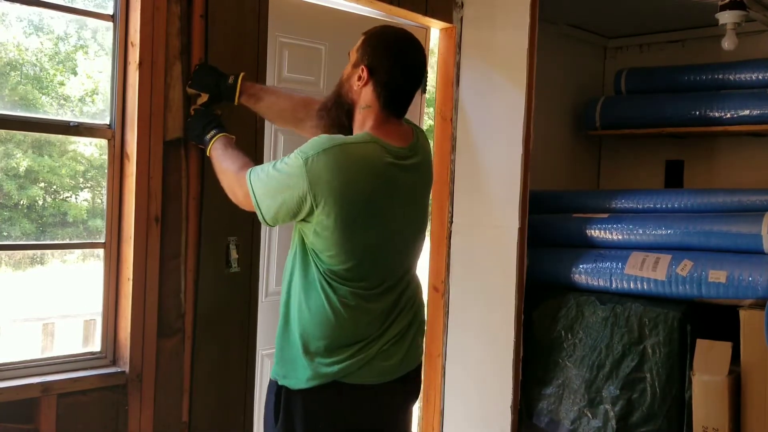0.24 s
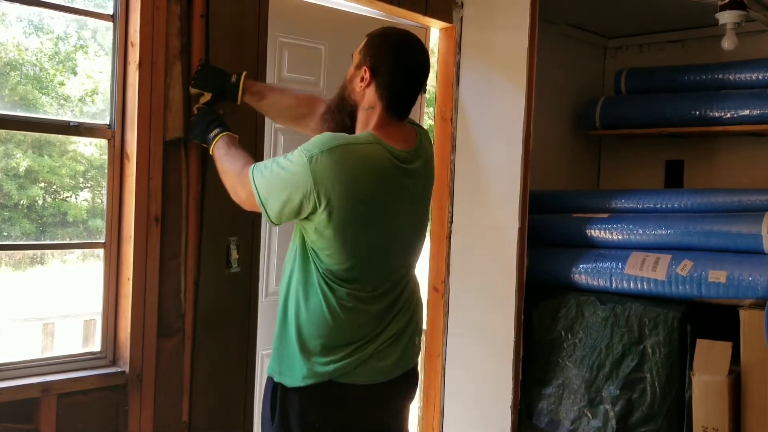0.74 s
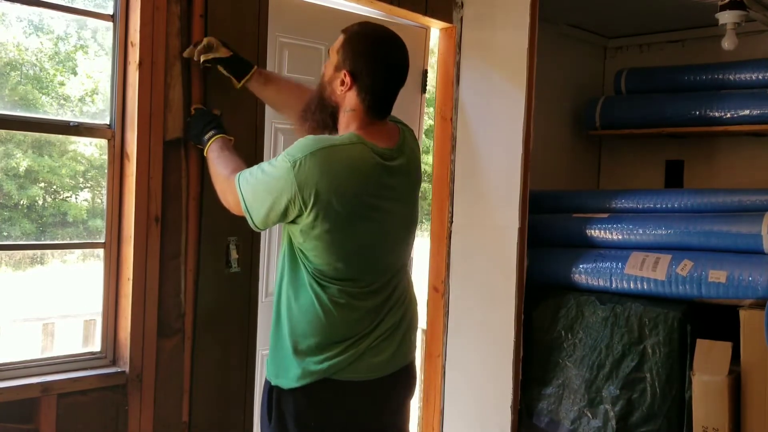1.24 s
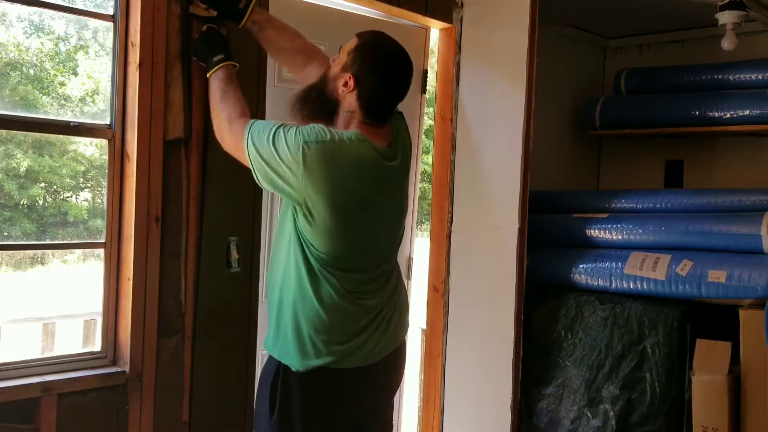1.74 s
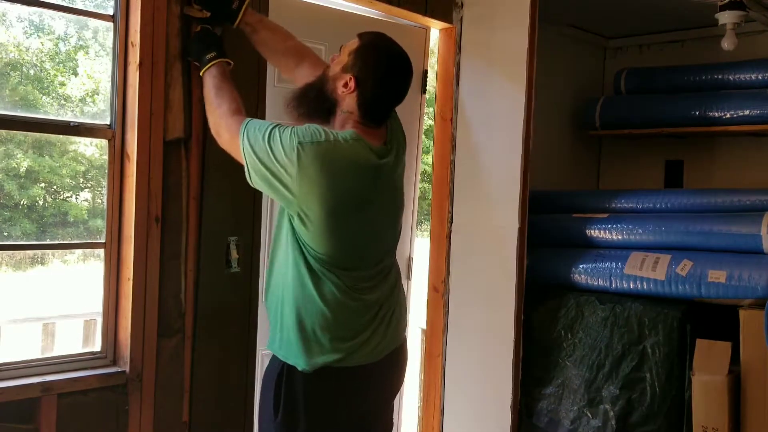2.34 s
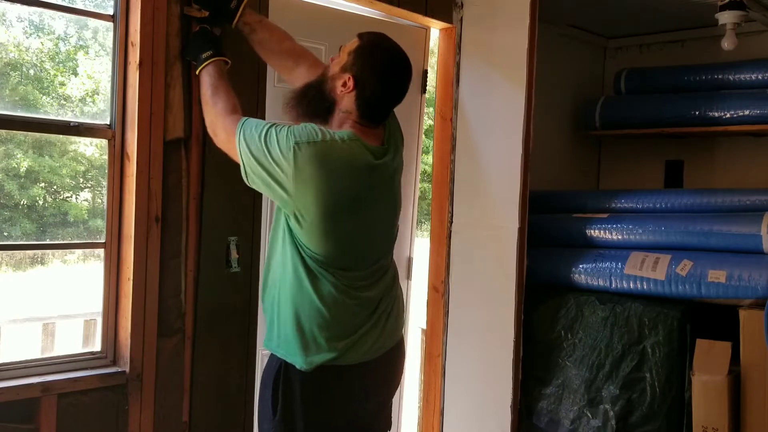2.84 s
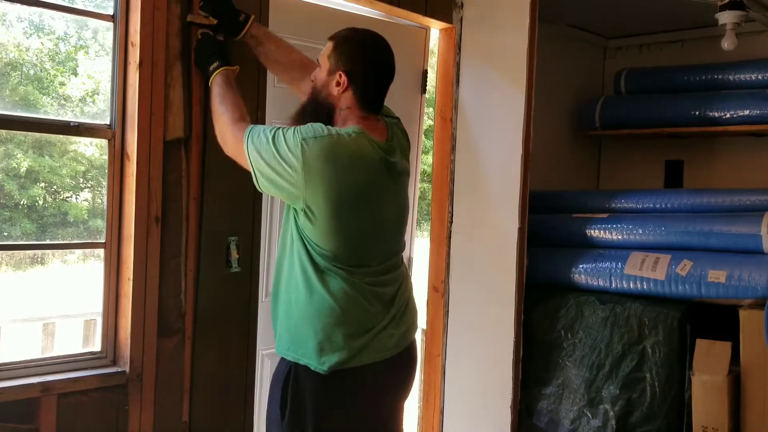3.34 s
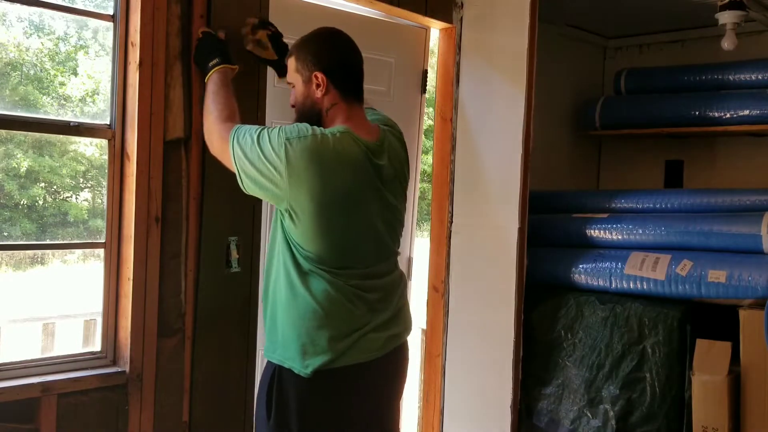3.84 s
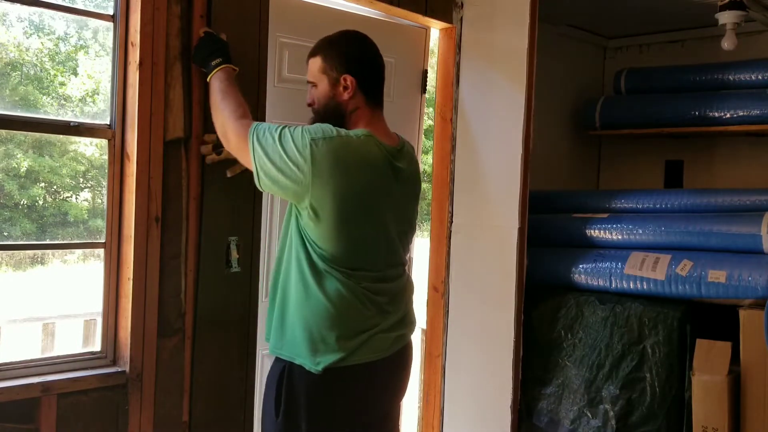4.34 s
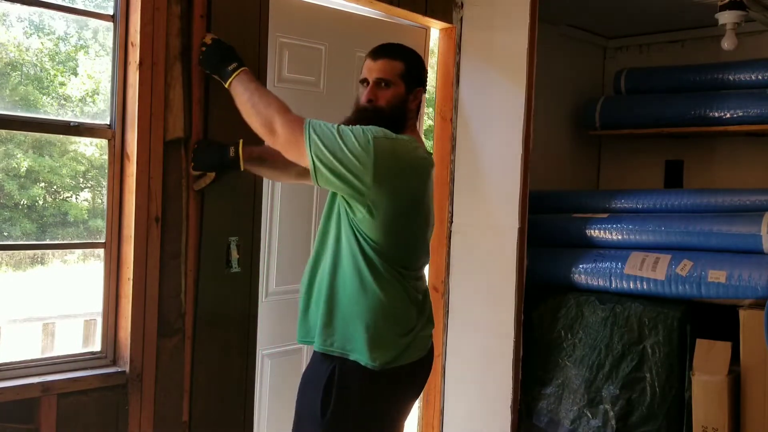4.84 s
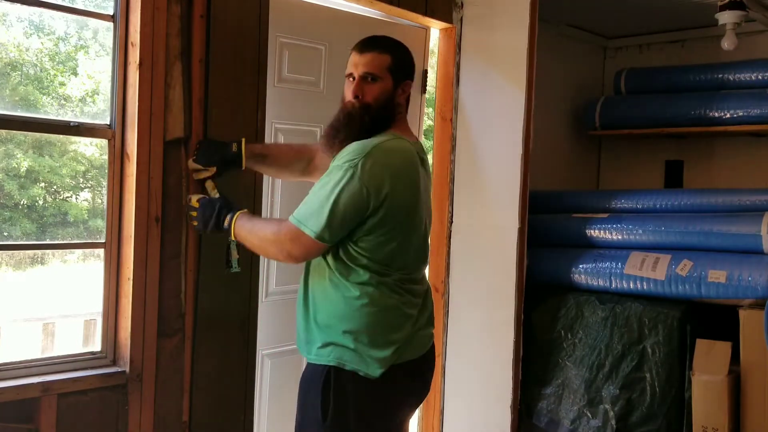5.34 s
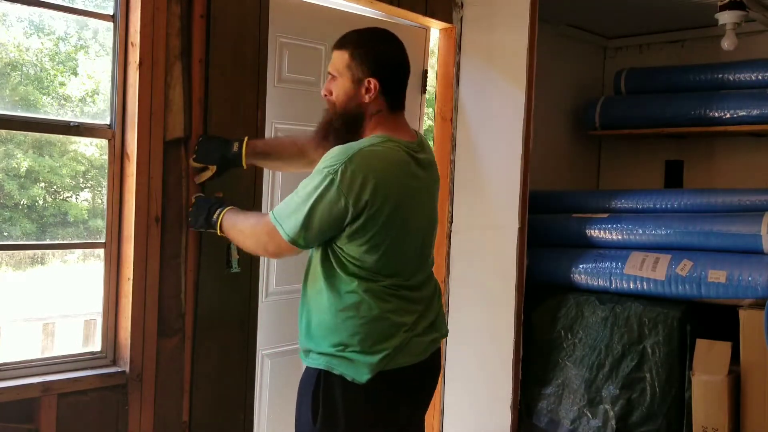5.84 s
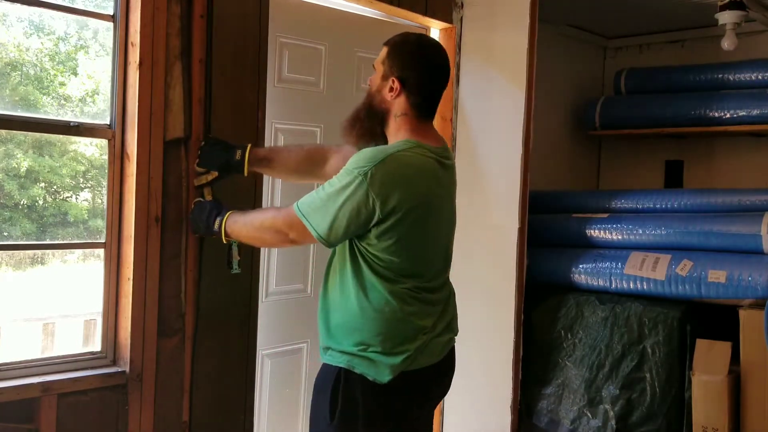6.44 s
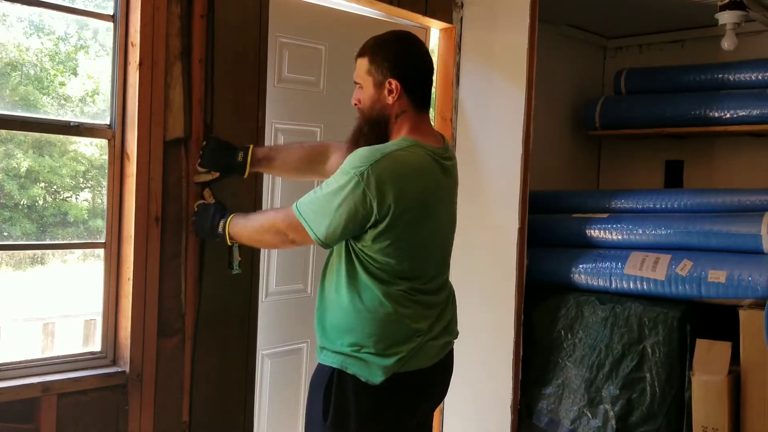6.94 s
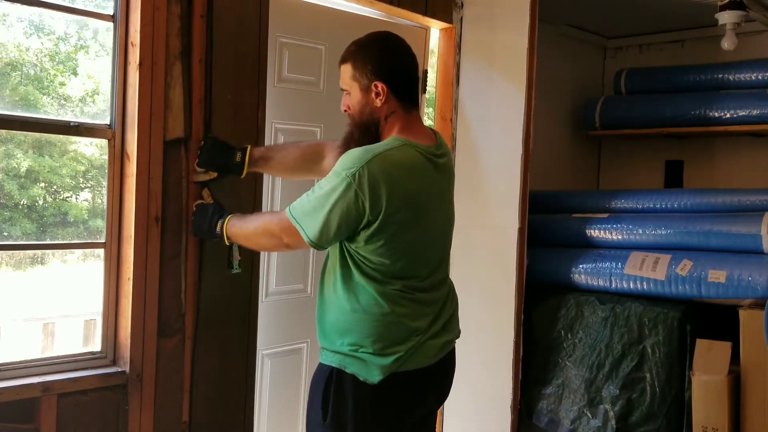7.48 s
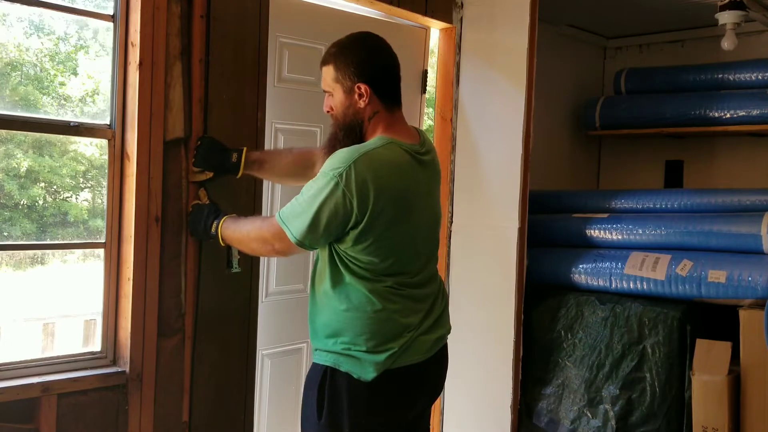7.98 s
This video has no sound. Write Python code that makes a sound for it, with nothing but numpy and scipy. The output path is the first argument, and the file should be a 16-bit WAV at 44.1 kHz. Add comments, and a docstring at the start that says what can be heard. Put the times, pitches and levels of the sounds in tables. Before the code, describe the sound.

A pry bar levers wooden trim off a door frame, with sharp cracks, dull wall thuds, scrapes and brief metal rattles.

```python
"""A bare room, where a few steps away a flat pry bar levers wooden trim off a door frame.
Each heave loads the stud wall with a thud, fibres and nails let go in sharp cracks, and the wall
springs back. Now and then the steel bar chatters on a nail and rings; between heaves, bar and gloves
scrape along the wood. The room gives cracks, scrapes and rings a short, bright tail.
Underneath lie a low rumble from outdoors and a faint hiss."""
import sys
import numpy as np
from scipy import signal
from scipy.fft import rfft, irfft, next_fast_len
from scipy.io import wavfile
from scipy.ndimage import uniform_filter1d

SR = 44100
rng = np.random.default_rng(int(sys.argv[2]) if len(sys.argv) > 2 else 0)


def dump_mix(stems):
    """Bounce the given channels to the path in sys.argv[1] as a 16-bit WAV at rate SR."""
    frames = np.atleast_2d(stems).T  # one column per channel
    limited = np.clip(frames, -1, 1)  # hard clip at full scale
    pcm = np.round(limited * 32767).astype(np.int16)
    wavfile.write(sys.argv[1], SR, pcm)


N = 362061


def gain_of(db):
    """Decibels to amplitude."""
    return 10 ** (np.asarray(db) / 20)


def unit_rms(x):
    """Scales to rms 1."""
    return x / np.sqrt(np.mean(x ** 2) + 1e-20)


def curve_at(points, hz):
    """Reads a curve on a log-frequency axis."""
    point_hz, value = np.transpose(points)
    return np.interp(np.log(hz + 1), np.log(point_hz + 1), value)


def add(mix, start_s, sound):
    """Mixes a stereo sound in from start_s."""
    start = round(start_s * SR)
    sound = sound[:, max(-start, 0):]
    part = mix[:, max(start, 0):][:, :sound.shape[1]]
    part += sound[:, :part.shape[1]]


def leak(energy, decay_s):
    """Lets energy leak away with the given time constant."""
    keep = np.exp(-1 / (decay_s * SR))
    return signal.lfilter([1 - keep], [1, -keep], energy + 1e-30)


def diffuse_field(size):
    """The stereo spectrum of noise arriving from all sides, most alike left and right in the bass."""
    # how closely the two sides agree: frequency_hz, correlation
    likeness = [(100, 0.81), (300, .88), (600, 0.47), (1200, 0.15), (2500, 0.0089), (15000, 0.6)]
    same = np.clip(curve_at(likeness, np.fft.rfftfreq(size, 1 / SR)), -1, 1)
    left, unrelated = rfft(rng.standard_normal((2, size)))
    return np.array([left, same * left + np.sqrt(1 - same ** 2) * unrelated])


def room(x, direct_db, left_db=-5, right_db=-10, treble_lift=0.71, build_s=0.0005, size=24576):
    """The direct sound reaches the left first; its energy fills the room and dies band by band."""
    # decay between the bare walls: centre_hz, t60_s
    decays = [(300, .27), (900, .25), (5000, 0.29), (14000, 0.24)]
    x, hz = np.pad(x, (0, size - len(x))), np.fft.rfftfreq(size, 1 / SR)
    facing = x + treble_lift * np.diff(x, prepend=0)  # the left side faces the work
    out = gain_of(direct_db) * np.array([gain_of(left_db) * facing, gain_of(right_db) * np.roll(x, 3)])
    field, energy = diffuse_field(size), leak(x ** 2, build_s)
    centres, t60s = np.transpose(decays)
    for share, t60 in zip(np.eye(len(t60s)), t60s):
        band = irfft(field * curve_at(np.c_[centres, share], hz))
        out += band * np.sqrt(leak(energy, t60 / (2 * np.log(1000))))
    return out


def wood_tone(x, spectrum, bass_db, middle_db, top_db, size=4096):
    """Colours a sound with the wood's spectrum and the tilt and dense, uneven modes of one spot."""
    hz = np.fft.rfftfreq(size, 1 / SR)
    tilt = [(330, bass_db), (600, middle_db), (850, middle_db), (2200, 0), (6000, 0), (13000, top_db)]
    modes_db = sum(depth_db * unit_rms(uniform_filter1d(rng.standard_normal(len(hz)), bins))
                   for bins, depth_db in [(4, 1.9), (24, 1.7)])
    response = gain_of(curve_at(spectrum, hz) + curve_at(tilt, hz)) * unit_rms(gain_of(modes_db))
    cepstrum = irfft(np.log(response))
    cepstrum[1:size // 2] *= 2  # folded to minimum phase, so attacks stay sharp
    cepstrum[size // 2 + 1:] = 0
    impulse = irfft(np.exp(rfft(cepstrum)))
    return signal.fftconvolve(x, impulse[None], axes=1)


def background(hiss_db=1, rumble_db=-72, rumble_swing=1.7, split_hz=400, waver_db=2):
    """A low, wavering rumble from outdoors under a faint hiss; both rise and fall together."""
    # colour of the ambience: frequency_hz, level_db
    spectrum = [(15, -44), (25, -7.5), (102, -3), (175, -14), (212, -23), (344, -20.5), (384, -23),
                (545, -24), (887, -25), (2000, -25.5), (6380, -29), (7710, -26), (16000, -26)]
    # its slow rise and fall: time_s, level_db
    swell = [(0, -70.5), (1.5, -73.5), (2, -80.5), (2.9, -76.5), (3.75, -80), (4.3, -73.5), (5, -69),
             (8.2, -73.5)]
    hz, t = np.fft.rfftfreq(N, 1 / SR), np.arange(N) / SR
    air = diffuse_field(N) * gain_of(curve_at(spectrum, hz))
    lowpass = 1 / (1 + (hz / split_hz) ** 4)
    level = np.interp(t, *np.transpose(swell))
    knots_s = np.arange(0, 9, .12)
    waver = waver_db * np.interp(t, knots_s, rng.standard_normal(len(knots_s)))
    rumble_gain = gain_of(rumble_db + rumble_swing * (level - level.mean()) + waver)
    rumble = unit_rms(irfft(air * lowpass, N)) * rumble_gain
    hiss = unit_rms(irfft(air * (1 - lowpass), N)) * gain_of(level + hiss_db)
    return rumble + hiss


def wall_thuds(soft_hz=340, push_s=0.032, release_s=0.021, strain_db=-13.5, stereo_width=.14):
    """A soft push sets the wall panels booming; they judder under strain and boom again when eased."""
    # resonances of the stud wall: pitch_hz, bandwidth_hz, level_db
    modes = [(73, 15, -4.5), (121, 28, -2.5), (165.4, 20, -0.5), (228, 28, -2), (261, 25, 3.5),
             (295, 50, 0)]
    # heaves on the bar, higher on stiffer spots: start_s, push_db, held_s, rebound_db, pitch_factor
    heaves = [ (0, -62, 0.037, -55, 0.97), (.316, -52, 0.11, -55, 1.02), (.717, -52, 0.071, -49.5, 1.16),
              (0.974, -62, .039, -53, 1.45), (1.16, -73, .037, -56.5, 1.1), (1.63, -55, .14, -43, 1.05),
              (2.093, -56, 0.15, -53, 1.02), (2.545, -56, 0.17, -49, 1.105),
              (3.03, -54.5, .16, -50.5, 1.066), (3.45, -75, 0.045, -51, 1.06),
              (4.799, -55.5, 0.073, -42.5, 0.88), (5.757, -46.5, 0.099, -70, .62),
              (6.27, -45, 0.16, -53.5, 0.76), (6.82, -57, 0.17, -57, 1.04),
              (7.31, -68.5, .198, -57.5, 1.55), (7.694, -58, .15, -53.5, 1.05)]
    out, t = np.zeros((2, N)), np.arange(SR // 2) / SR
    wall = sum(gain_of(db) * np.exp(-np.pi * width * t) * np.sin(2 * np.pi * hz * t) * (-1) ** k
               for k, (hz, width, db) in enumerate(modes))
    wall = signal.sosfilt(signal.butter(6, soft_hz, fs=SR, output="sos"), wall)
    for start_s, push_db, held_s, rebound_db, pitch_factor in heaves:
        panel = np.interp(t * pitch_factor, t, wall)
        push = start_s, push_db, push_s
        strain = start_s + push_s, push_db + strain_db, held_s
        rebound = start_s + held_s, rebound_db, push_s
        for at_s, db, length_s in push, strain, rebound:
            envelope = np.exp(-np.maximum(t - length_s, 0) / release_s)
            mid, side = rng.standard_normal((2, len(t))) * envelope
            force = [mid + stereo_width * side, mid - stereo_width * side]
            boom = signal.fftconvolve(force, panel[None], axes=1)
            power = np.sum(boom[0] ** 2) / (SR * (length_s + release_s))
            add(out, at_s - .005, gain_of(db) * boom / np.sqrt(power))
    return out


def scrapes(gain_db=-3, slips_per_s=2000, uneven_db=6.5, direct_db=-2, bass_db=-0.5, middle_db=-1):
    """Dense, tiny slips over the grain swell and fade with each stroke."""
    # bar and gloves sliding on wood: peak_s, level_db, half_length_s, body_db, top_db
    strokes = [ (.002, -38, 0.0031, -9, -9.5), (0.345, -47, 0.0074, 3.5, 0),
               (1.02, -34.5, 0.0095, -1.5, -5.5), (1.188, -43, 0.011, -5.5, -3), (3.152, -62, 0.061, 6, -1),
               (3.49, -39, .015, -8, -3.5), (3.858, -57.5, .025, -7.5, -8), (4.035, -45.5, .018, -20.5, 0),
               (4.436, -58, 0.073, -4.5, 2), (4.548, -48, 0.017, 1, -9), (4.64, -46, 0.028, 4.5, -3),
               (4.822, -43.5, 0.049, -8.5, 0), (4.882, -34, 0.022, -6.5, -8.5),
               (5.141, -41.5, 0.024, -21, -7.5), (5.242, -47, 0.018, -2.5, -5),
               (5.727, -48, 0.054, -1.5, -5.5), (5.876, -55.5, 0.025, 15.5, -3),
               (6.051, -61, 0.044, -2, -3), (6.237, -33, 0.011, -15.5, -3), (6.442, -40.5, 0.04, -9.5, -4),
               (6.762, -52.5, 0.021, -5, -1), (6.986, -48.5, 0.043, -5, -1.5), (7.522, -59.5, 0.059, -3, 3),
               (7.826, -52.5, 0.032, -1, 3.5), (8.2, -62, 0.096, -1, -2)]
    # colour of rubbed wood: frequency_hz, level_db
    spectrum = [(30, 7.5), (90, 4), (200, 9.5), (380, 9.5), (600, 8), (900, -1.5), (1350, 0.5),
                (1800, -3.5), (2400, -2), (3300, -4), (4500, -1), (7500, 2), (9500, -1.5), (15000, 1.5)]
    out, t = np.zeros((2, N)), np.arange(-SR // 4, SR // 4) / SR
    for peak_s, db, half_length_s, body_db, top_db in strokes:
        sizes = gain_of(uneven_db * np.minimum(rng.exponential(1, len(t)), 4))
        signs = rng.choice([-1, 1], len(t))
        slipping = rng.random(len(t)) < slips_per_s / SR
        stroke = unit_rms(sizes * signs * slipping) / np.cosh(t / half_length_s)
        tilt_db = body_db + bass_db, body_db + middle_db, top_db
        scrape = wood_tone(room(stroke, direct_db), spectrum, *tilt_db)
        add(out, peak_s + t[0], gain_of(db + gain_db) * scrape)
    return out


def wood_cracks(gain_db=26, main_share=0.5, lead_in=.9, tear_share=0.01, tear_s=0.0043, fibres=16):
    """One main fibre snaps; smaller ones lead up to it quickly and trail off after it."""
    # wood letting go: time_s, level_db, splinter_spread_s, body_db, top_db, direct_db
    cracks = [ (.073, -64, .0007, -7, 13, 1), (.356, -45, 0.0033, 8, 7, 1),
              (.39, -52.5, 0.00045, 8, 4.5, 0.5), (0.763, -30.5, 0.0011, -3, 5, -3),
              (.778, -35, 0.002, 5, 10.5, -2), (.801, -24.5, 0.00096, -9.5, -2, 11),
              (1.666, -28, 0.0012, -1, 3.5, -4.5), (1.678, -37, 0.0015, 3.5, -5, -3.5),
              (1.7246, -31.5, 0.00071, 5, -1, 3.5), (2.129, -31, 0.0012, 1, 1, -5.5),
              (2.135, -24.5, 0.0011, 1, -4, 1.5), (2.272, -54, 0.0031, 8, 1, 5.5),
              (2.37, -67.5, 0.0015, -6.5, 6.5, 1.5), (2.593, -36.5, 0.0015, -0.5, -2.5, -2.5),
              (2.6, -26, .0018, 5.5, -1, -0.5), (2.6419, -30, 0.00078, 1.5, 2, -2),
              (3.082, -45, 0.0016, 3, -12.5, -2.5), (3.372, -59, 0.00021, -3, 4, -3),
              (3.5, -42.5, 0.0014, 5.5, -4.5, 10), (4.582, -42, .002, -23, 5, -4),
              (4.646, -37.5, .0017, -16, -5.5, 1), (5.079, -49, 0.00073, 10.5, -7, -14),
              (6.167, -26.5, 0.0013, -7.5, -2.5, -2.5), (6.209, -31.5, 0.0018, 0.5, 4, 0),
              (6.257, -18.5, 0.0027, 0.5, 3, -8), (6.272, -15, 0.002, 0.5, -3, -13),
              (6.301, -14, 0.0036, -3.5, -2.5, 7), (6.78, -34, 0.00067, -12, -3, 1.5),
              (6.8142, -15, 0.0011, 4, -4, -0.5), (6.8487, -21, 0.00025, 2, 1.5, 5.5),
              (6.871, -25, 0.0038, 0, -2, 11), (7.017, -46.5, 0.00043, -23, 7, -17),
              (7.285, -38.5, 0.0024, -6, 0.5, -3.5), (7.316, -42.5, 0.0072, 1.5, -3, 2.5),
              (7.483, -55.5, 0.00065, 1, 3, -2), (7.691, -36, 0.00086, -8.5, 5.5, -1.5)]
    # colour of splitting wood: frequency_hz, level_db
    spectrum = [(30, -19), (70, -11), (160, 4.5), (270, 4.5), (520, -3.5), (750, -2), (1000, -4.5),
                (1800, 0.5), (3200, -2.5), (4200, -0.5), (7600, 2), (9400, -3), (12000, -1.5), (15000, 1.5)]
    out, centre = np.zeros((2, N)), SR // 20
    t = np.arange(-centre, centre) / SR
    for time_s, db, spread_s, body_db, top_db, direct_db in cracks:
        delays_s = rng.laplace(0, spread_s, fibres)
        delays_s[delays_s < 0] *= lead_in
        at = np.clip(centre + delays_s * SR, 0, len(t) - 1).astype(int)
        sizes = rng.standard_normal(fibres)
        snaps = np.bincount(at, sizes * np.sqrt(1 - main_share) / np.linalg.norm(sizes), len(t))
        snaps[centre] += np.sqrt(main_share)
        tear = rng.standard_normal(len(t)) * np.exp(-abs(t) / (2 * tear_s))  # fine fibres give way
        snaps += np.sqrt(tear_share) * tear / np.linalg.norm(tear)
        crack = wood_tone(room(snaps, direct_db, size=18432), spectrum, body_db, .99 * body_db, top_db)
        add(out, time_s + t[0], gain_of(db + gain_db) * crack)
    return out


def bar_rings(gain_db=-1, direct_db=-2, low_below_hz=3000):
    """The steel chatters on nails: a rough, short ring, damped by the gloved hands."""
    # the bar rattling against nails: start_s, level_db, decay_s, low_modes_db
    rattles = [(1.725, -34, 0.018, -38), (4.02, -57.5, 0.043, -1), (4.63, -45, 0.019, -23),
               (4.794, -54.5, 0.11, 15.5), (4.875, -36, 0.015, 11), (5.091, -50.5, 0.061, -1),
               (6.871, -49, 0.011, -8), (7.285, -52, 0.011, 13), (7.692, -46, .008, 4)]
    # close clusters of modes in the steel: pitch_hz, bandwidth_hz, level_db
    modes = [(1375, 32, 7), (2324, 130, 1), (3600, 93, 4.5), (4100, 330, 2.5), (4300, 120, 3),
             (5860, 160, -11), (7200, 240, 5.5), (7640, 74, -6)]
    out, t = np.zeros((2, N)), np.arange(SR // 3) / SR
    for start_s, db, decay_s, low_modes_db in rattles:
        steel = np.zeros(len(t))
        for hz, width, mode_db in modes:
            strength = gain_of(mode_db + low_modes_db * (hz < low_below_hz)) * width
            steel += strength * np.exp(-np.pi * width * t) * np.sin(2 * np.pi * hz * t)
        chatter = room(rng.standard_normal(len(t)) * np.exp(-t / decay_s), direct_db)
        ring = signal.fftconvolve(chatter, steel[None] / np.linalg.norm(steel), axes=1)
        add(out, start_s, gain_of(db + gain_db) * ring)
    return out


def scene():
    """All the work on the door frame, over the background."""
    # level of the work, higher until a brief dip: time_s, gain_db
    fader = [(3.253, 5), (3.258, -36), (3.3, -3), (3.34, -2.5)]
    work = wood_cracks() + scrapes() + bar_rings() + wall_thuds()
    fader_db = np.interp(np.arange(N) / SR, *np.transpose(fader))
    return work * gain_of(fader_db) + background()


def record(dry, ceiling=.9, cutoff_hz=16000):
    """The image leans left, most in the treble; the hardest peaks round off and the very top is cut."""
    # stereo lean: frequency_hz, left_minus_right_db
    balance = [(100, 3), (600, 2.7), (2000, 3), (8000, 4), (13000, 4.5)]
    size = next_fast_len(N + SR // 4)
    lean_db = curve_at(balance, np.fft.rfftfreq(size, 1 / SR)) / 2
    leaning = irfft(rfft(dry, size) * gain_of([lean_db, -lean_db]), size)[:, :N]
    rounded = ceiling * np.tanh(leaning / ceiling)
    lowpass = signal.firwin(511, cutoff_hz, window=("kaiser", 9), fs=SR)
    return signal.oaconvolve(rounded, lowpass[None], "same")


dry = scene()
out = record(dry)
dump_mix(out)
```